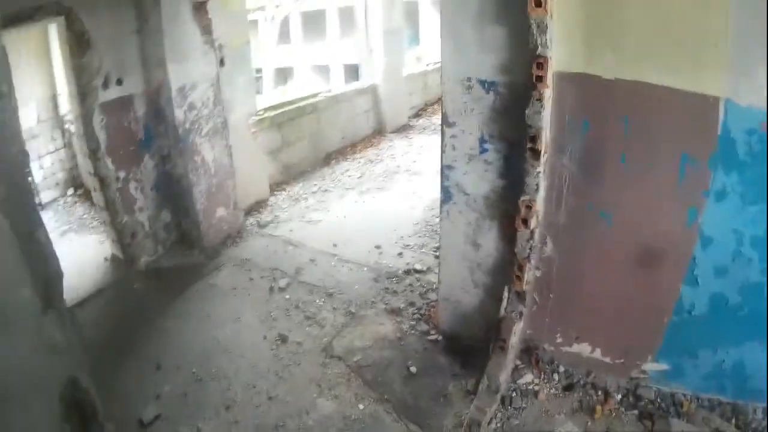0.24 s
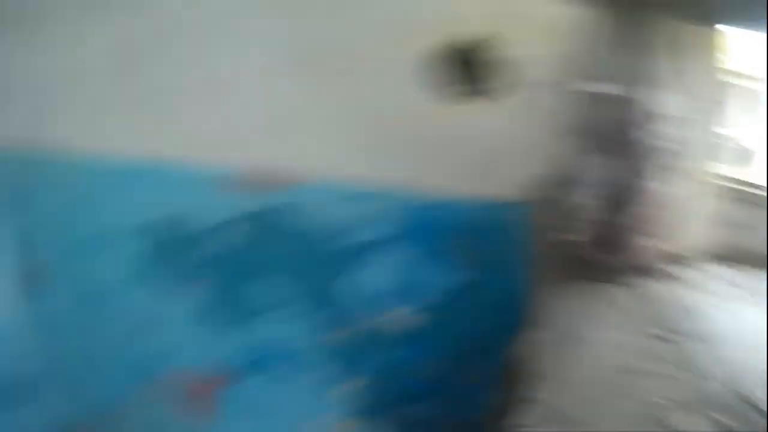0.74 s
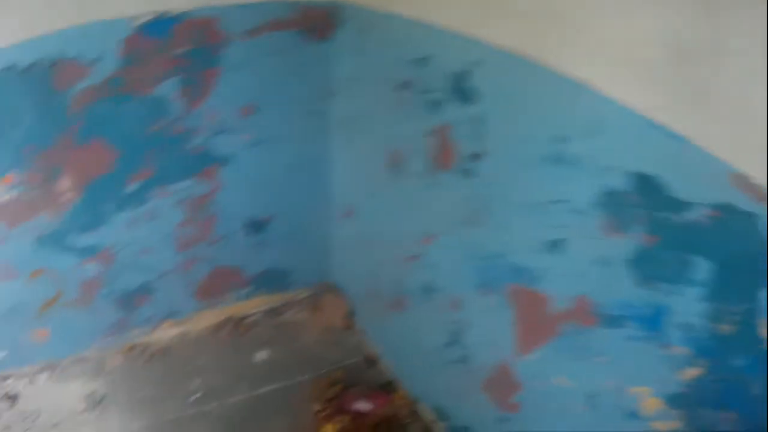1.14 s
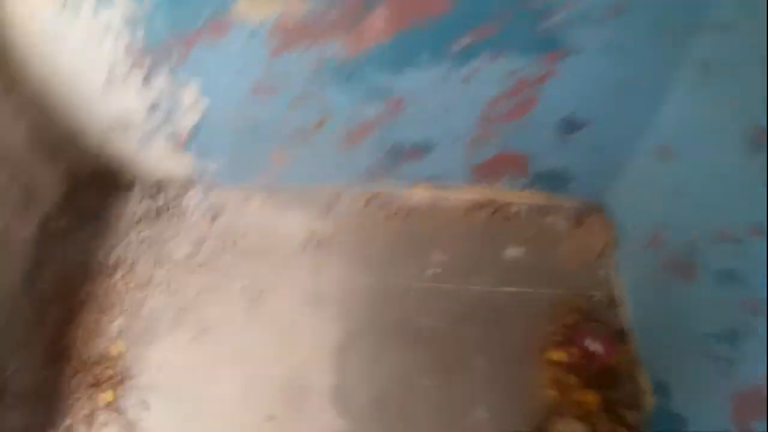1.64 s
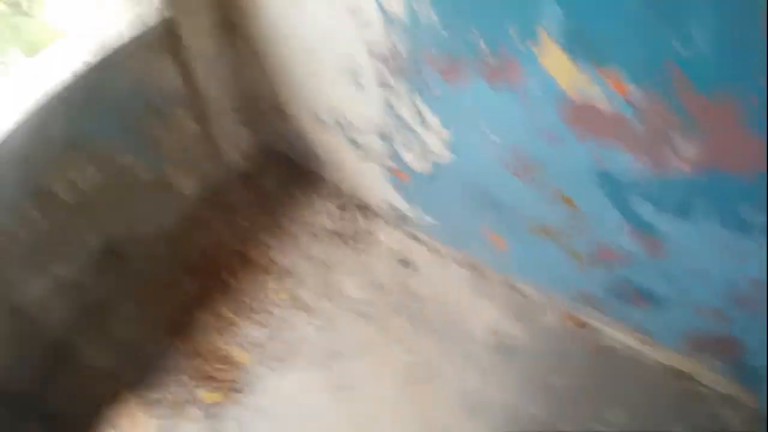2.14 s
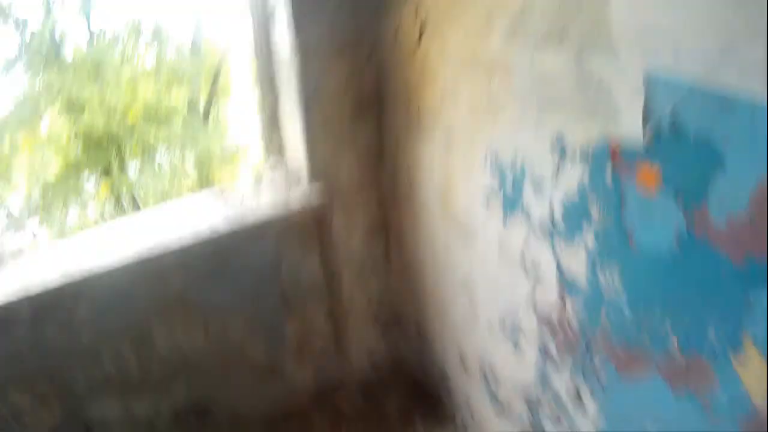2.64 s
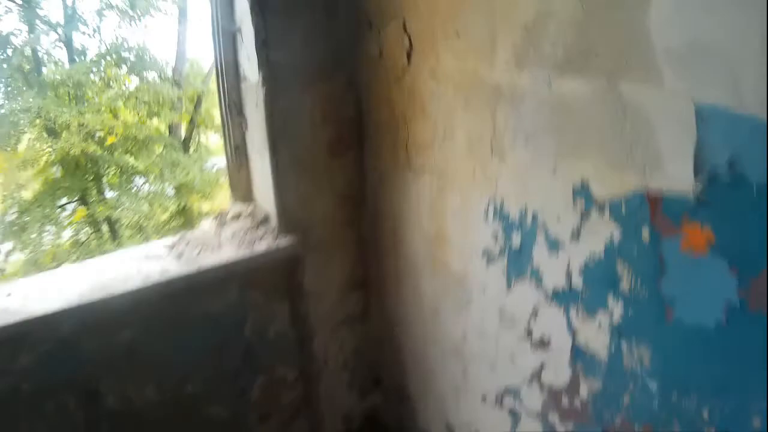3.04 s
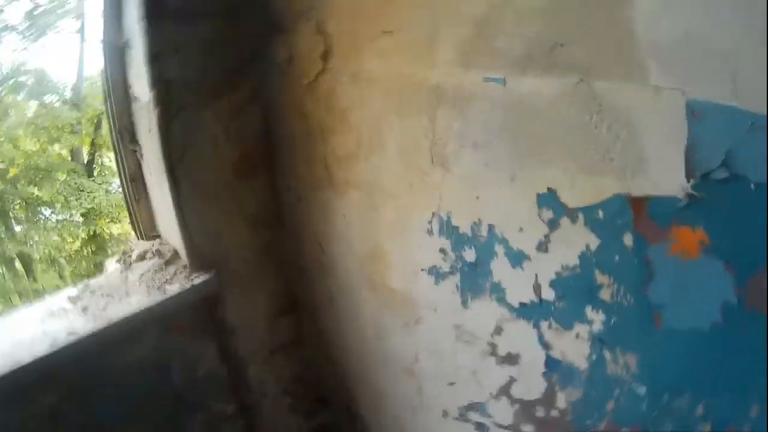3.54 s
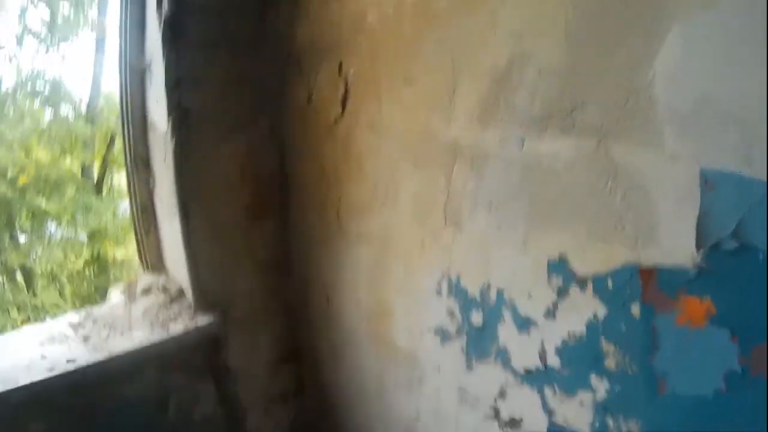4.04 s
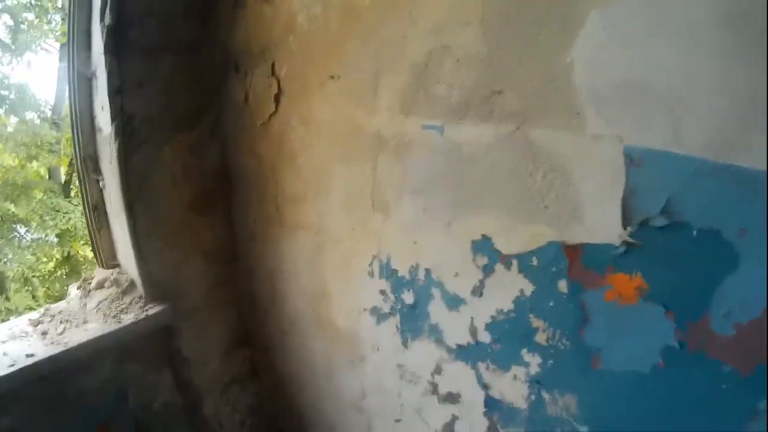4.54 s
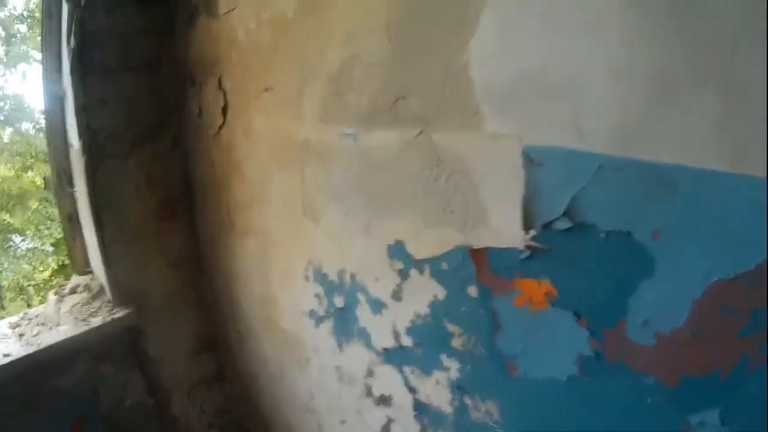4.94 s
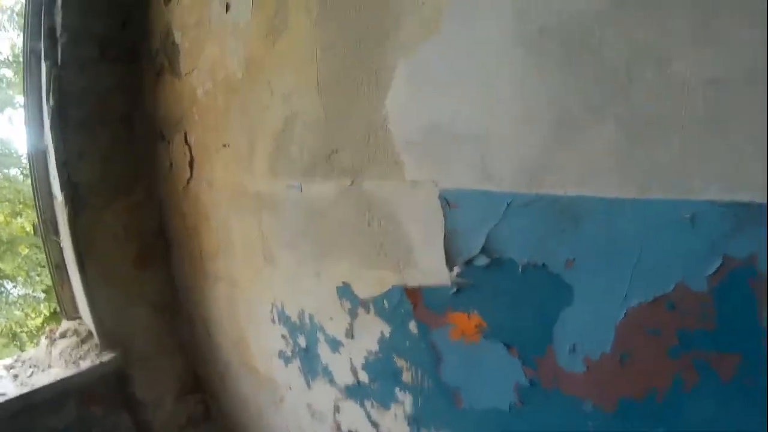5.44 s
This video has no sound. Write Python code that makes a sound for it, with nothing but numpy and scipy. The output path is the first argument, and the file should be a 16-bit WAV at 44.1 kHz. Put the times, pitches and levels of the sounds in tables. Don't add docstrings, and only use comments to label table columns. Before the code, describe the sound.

Close-up handling noise of a cased camera in a derelict room: muffled thumps, gritty scrapes, sharp knocks, faint hiss and thin whine.

```python
import sys
import numpy as np
from scipy import signal
from scipy.fft import rfft, irfft
from scipy.io import wavfile
from scipy.ndimage import uniform_filter1d

SR = 44100
rng = np.random.default_rng(int(sys.argv[2]) if len(sys.argv) > 2 else 0)


def transcribe(u):
    v = np.clip(np.atleast_2d(u).T, -1, 1)
    q = np.round(v * 32767).astype(np.int16)
    wavfile.write(sys.argv[1], SR, q)


def amplitude_ratio(level_db):
    exponent = np.asarray(level_db, float) / 20
    return 10 ** exponent


N = 251370
T = np.arange(N) / SR
CONTROL_STEP = 64
CONTROL_T = T[::CONTROL_STEP]
LIVE_S = 1.35

# hz, width_hz, level_db
CASE_LOW = [(130, 132, -11), (230, 97, -3), (398.7, 114, 6), (529, 252, -6), (819, 133, -0.5),
            (1110, 121, -0.5), (1315, 173, 1), (1530, 575, -16.5)]


def evened(x):
    return x / np.sqrt(np.mean(x ** 2) + 1e-20)


def shaped(x, spectrum):
    f, db = np.transpose(spectrum)
    hz = np.fft.rfftfreq(N, 1 / SR)
    gain_db = np.interp(np.log(hz + 1), np.log(f + 1), db, -80, -80)
    return evened(irfft(rfft(x) * amplitude_ratio(gain_db), N))


def add(mix, start_s, sound):
    part = mix[round(start_s * SR):][:len(sound)]
    part += sound[:len(part)]


def resonate(x, hz, width_hz):
    r = np.exp(-np.pi * width_hz / SR)
    pole = r * np.exp(2j * np.pi * hz / SR)
    return 2 * signal.lfilter([1 - r], [1, -pole], x).real


def modes(x, table):
    out = 0
    for k, (hz, width_hz, db) in enumerate(table):
        once = resonate(x, hz, 1.38 * width_hz)
        out = out + (-1) ** k * amplitude_ratio(db) * resonate(once, hz, 1.38 * width_hz)
    return out


def lumps(top_hz):
    lowpass = signal.butter(2, top_hz, fs=SR / CONTROL_STEP, output="sos")
    coarse = signal.sosfiltfilt(lowpass, rng.standard_normal(N // CONTROL_STEP + 2))
    coarse = np.clip(evened(coarse), -2.5, 2.5)
    return np.interp(np.arange(N) / CONTROL_STEP, np.arange(len(coarse)), coarse)


def circuit():
    # hz, level_db (per Hz)
    hiss_spectrum = [(12, -22), (20, -2.5), (33, -7), (65, -16.5), (81, -14), (158, -16), (422, -22),
                     (485, -24.5), (1530, -31), (1710, -31), (3070, -34), (9400, -36), (16000, -37.5)]
    live_spectrum = [(1470, -19), (2500, 7.5), (3440, 1.5), (8870, -7), (9730, -1), (10000, -11),
                     (14200, -9), (16000, -32)]
    # start_s, end_s, pitch_hz, level_db
    side_whines = [
        (1.51, 1.65, 8393, -82),
        (2.22, 2.38, 8393, -82),
        (3.35, 3.95, 8393, -86),
        (4.21, 4.46, 8393, -83),
        (5.35, 5.56, 8393, -86),
        (1.51, 1.65, 11186, -85),
        (2.22, 2.34, 11186, -85),
        (5.39, 5.52, 11186, -86),
        (1.9, 2.5, 7750, -91),
    ]
    whine_hz, throb_hz = 9525.3, 36.4
    live = T > LIVE_S

    hiss = amplitude_ratio(-65.5) * shaped(rng.standard_normal(N), hiss_spectrum)
    hiss = hiss + amplitude_ratio(-76.5) * shaped(rng.standard_normal(N), live_spectrum) * live
    throb_phase = 2 * np.pi * throb_hz * T
    throb = 1.05 + 2.1 * np.cos(throb_phase) - 0.25 * np.cos(3 * throb_phase)
    whine_db = np.where(live, -78.5, -86) + 2.3 * lumps(12)
    whine = amplitude_ratio(whine_db) * np.sin(2 * np.pi * whine_hz * T) * throb
    for start_s, end_s, hz, db in side_whines:
        fade = np.clip(np.minimum(T - start_s, end_s - T) / 0.023, 0, 1)
        whine = whine + amplitude_ratio(db) * (1 + 0.5 * throb) * np.sin(2 * np.pi * hz * T) * fade
    return hiss + whine


def strokes(table):
    span_db = 20
    peak_s, db, rise_s, fall_s, trait = np.transpose(table)[:, :, None]
    away = np.maximum((peak_s - CONTROL_T) / np.abs(rise_s), (CONTROL_T - peak_s) / np.abs(fall_s))
    return db - span_db * away, trait


def effort():
    # peak_s, peak_db, rise_s, fall_s, rumble_db (over the scrape)
    jolts = [(1.377, -48.5, 0.027, 0.083, 9.5), (1.548, -40, 0.052, 0.028, 9), (1.632, -50, .04, 0.06, 5),
             (1.69, -50, .07, .1, 5), (1.81, -50, .14, 0.27, -4), (2.128, -39, 0.021, 0.067, 2),
             (2.62, -41, 0.064, 0.082, 4), (2.56, -61, 0.071, 0.086, -5), (3.22, -39.5, .08, 0.064, 2.5),
             (3.495, -33, 0.039, 0.094, 5), (3.851, -34.5, 0.048, 0.12, 2.5),
             (4.18, -45.5, 0.18, 0.11, -1.5), (4.365, -35, 0.025, 0.069, 5.5),
             (4.48, -74, 0.049, 0.036, 13), (5.345, -66, .06, .06, 12), (1.99, -56.5, 0.16, .2, 9),
             (3.0, -59.5, 0.2, 0.18, 7), (1.59, -53.5, 0.11, 0.069, 8.5), (4.635, -40, 0.086, .04, -0.5),
             (4.916, -50, .045, 0.14, 0), (5.038, -37.5, 0.12, 0.051, -2), (5.57, -59.5, 0.015, 0.14, 12)]
    # peak_s, peak_db, rise_s, fall_s, bright_db (upper modes)
    drags = [(1.95, -52, 0.083, 0.57, -9), (2.09, -52.5, 0.24, 0.15, -6), (2.326, -47.5, .06, 0.18, -22),
             (2.76, -58, 0.13, 0.13, -3), (2.84, -42, 0.054, 0.1, -7.5), (2.93, -51, 0.11, .1, -26),
             (5.295, -61.5, 0.077, 0.035, -9), (2.986, -45, .13, 0.26, -15), (3.07, -43, 0.16, 0.048, -4.5),
             (3.455, -52, 0.24, 0.055, -13), (3.735, -40, 0.11, 0.033, -14), (4.062, -55, 0.21, 0.16, -12),
             (4.424, -41, 0.15, 0.013, -14), (4.305, -51, 0.042, 0.075, -10),
             (5.145, -45.5, .04, 0.086, -17), (5.1, -51, .1, .1, -9), (5.39, -44.5, 0.051, .2, -14),
             (3.96, -62, .05, 0.16, 2), (4.56, -51.5, 0.054, .2, -19), (4.75, -54.5, 0.039, 0.16, -7),
             (5.44, -37, 0.057, 0.083, -16), (5.55, -46, 0.16, 0.0098, -14), (5.684, -42, 0.02, 0.018, -15)]
    # peak_s, peak_db, rise_s, fall_s, bright_db (upper modes)
    scrapes = [(.704, -68.5, .025, .12, 1), (1.47, -58.5, 0.05, 0.19, -1), (2.195, -37, 0.07, 0.11, -7.5),
               (2.475, -36.5, .095, 0.1, -6.5), (3.154, -35.5, 0.019, 0.067, 1.5),
               (3.587, -37.5, 0.029, 0.058, 2), (3.915, -37, 0.071, 0.071, -3.5),
               (4.659, -24, 0.0136, 0.042, 5), (4.678, -27, 0.022, 0.01, 4), (4.697, -29.5, 0.03, 0.04, -7),
               (5.192, -45.5, 0.12, 0.017, -6.5)]
    jolt, weight = strokes(jolts)
    drag, dull = strokes(drags)
    scrape, sharp = strokes(scrapes)
    rest = np.where(CONTROL_T[None] > LIVE_S, 0., -60.)
    low = (jolt, drag, scrape, rest - 95)
    upper = (jolt - 10.5, drag + dull, scrape + sharp, rest - 91.5)
    rumble = (jolt + weight, drag - 4, scrape - 11 - 0.6 * sharp, rest - 58.5)
    spray = (jolt - 25.5, drag - 30, scrape - 13.5 + 0.48 * sharp, rest - 79)
    curves = []
    for parts in (low, upper, rumble, spray):
        power = (amplitude_ratio(np.concatenate(parts)) ** 2).sum(0)
        curves.append(np.interp(T, CONTROL_T, 10 * np.log10(power + 1e-20)))
    return curves


def rub():
    # hz, width_hz, level_db
    case_high = [(1887, 383, 19.5), (2300, 53, -3.5), (2360, 540, -6.5), (2710, 170, 5.5), (3103, 110, 3),
                 (3830, 170, 3), (4720, 420, -9)]
    # hz, level_db (per Hz)
    sway_spectrum = [(10, -27), (18, -9.5), (32, -6), (60, -15), (100, -14), (170, -12.5), (300, -31)]
    spray_spectrum = [(2200, -29), (2750, 5), (3620, -3.5), (3830, 10.5), (4050, -5.5), (4700, -2.5),
                      (5600, -10.5), (8500, -30), (16000, -32.5)]
    air_spectrum = [(1900, -19), (2600, 2), (3800, 0.5), (5200, -3), (7500, 3), (12000, 1), (16000, 0.5)]
    grit_per_s, grit_db, smooth = 900, 3.6, 0.55
    lumpy_db, patchy_db, rumble_lumpy_db = 2.5, 2.5, 2.5

    clicks = (rng.random(N) < grit_per_s / SR) * rng.choice([-1., 1.], N)
    clicks = clicks * amplitude_ratio(grit_db * np.minimum(rng.exponential(1, N), 2.8))
    lumpy = lumps(30.4)
    drive = (evened(clicks) + smooth * 2 * rng.standard_normal(N)) * amplitude_ratio(lumpy_db * lumpy)

    def wandering(table):
        total = 0
        for k, mode in enumerate(table):
            total = total + (-1) ** k * modes(drive * amplitude_ratio(patchy_db * lumps(28.7)), [mode])
        return evened(total)

    sway_db = rumble_lumpy_db * (lumps(12) + 1.5 * lumpy)
    sway = shaped(rng.standard_normal(N) * amplitude_ratio(sway_db), sway_spectrum)
    scrape_db, upper_db, rumble_db, spray_db = effort()
    out = amplitude_ratio(scrape_db + 3) * wandering(CASE_LOW) + amplitude_ratio(upper_db) * wandering(case_high)
    out = out + amplitude_ratio(rumble_db - 2) * sway + amplitude_ratio(spray_db) * shaped(drive, spray_spectrum)
    air_db = -70.5 + 0.47 * np.minimum(uniform_filter1d(scrape_db, 2000) + 35.5, 0)
    return out + amplitude_ratio(air_db) * shaped(rng.standard_normal(N), air_spectrum)


def snaps():
    # start_s, peak_db, pitch_hz, length_s
    grit = [(1.512, -35, 1190, 0.0043), (1.546, -29, 830, 0.0057), (1.808, -36.5, 804, 0.012),
            (2.13, -26, 1080, 0.0064), (2.185, -34, 1200, 0.0018), (2.611, -30.5, 1190, .0044),
            (2.684, -42, 1290, 0.0031), (2.704, -36, 1750, 0.0023), (2.734, -31.5, 1470, 0.0023),
            (2.824, -28, 1320, 0.0022), (2.833, -32, 1090, 0.002), (3.132, -38, 1130, .0035),
            (3.274, -39, 1180, 0.0026), (3.4995, -22, 1290, .004), (3.4875, -21, 1140, 0.004),
            (3.582, -25, 1180, 0.0054), (3.71, -43, 1290, 0.0063), (3.819, -35, 1100, 0.005),
            (3.864, -30, 1380, .012), (3.901, -24, 1387, 0.007), (2.534, -40, 1690, 0.0023),
            (4.302, -38, 1230, 0.0024), (4.364, -44, 1270, 0.0023), (4.641, -27, 1260, 0.0067),
            (5.192, -40.5, 1205, 0.0092), (5.396, -35, 1070, 0.0088), (5.429, -32, 1080, 0.006),
            (5.514, -39, 1190, 0.0072), (5.547, -36.5, 1280, 0.0064), (5.686, -39, 1236, 0.0026),
            (3.478, -28, 830, .004), (3.576, -30, 1600, .004), (3.589, -28, 1500, .005),
             (3.596, -30, 1500, .003), (3.601, -30, 1250, .003), (3.164, -27, 2680, .006),
             (3.164, -30, 3620, .006), (3.165, -17, 1820, .006), (4.653, -32, 3800, .009),
             (4.665, -25, 2650, .008), (4.656, -20, 1190, .005), (4.672, -18, 1290, .006),
             (4.696, -28, 1200, .005), (4.716, -29, 1500, .004), (3.853, -29, 1290, .006),
             (3.909, -27, 1350, .007), (3.922, -31, 1400, .005), (3.933, -36, 2000, .005),
             (3.956, -54, 3820, .01), (5.359, -43, 1300, .005), (5.443, -32, 1120, .008),
             (5.464, -36, 1350, .012), (3.703, -40, 1250, .004), (2.599, -35, 1200, .005),
             (2.183, -46, 2680, .006), (2.462, -46, 2720, .006), (2.372, -46, 1700, .004),
             (2.325, -44, 1150, .008), (1.6, -48, 1200, .008), (1.535, -60, 3820, .008),
             (4.355, -32, 800, .006), (4.17, -40, 1280, .008), (4.987, -36, 1300, .006),
             (5.138, -40, 1100, .005), (5.163, -40, 1350, .006), (5.08, -43, 1300, .006),
             (2.978, -42, 1800, .004), (3.73, -36, 1300, .007), (1.69, -44, 1200, .01),
             (2.65, -40, 1250, .006), (4.905, -44, 1400, .006), (5.03, -36, 1300, .008),
             (3.894, -31, 1200, .005), (4.678, -25, 1950, .006), (4.654, -44, 5800, .006),
             (4.668, -42, 5500, .01), (4.669, -19, 1050, .005), (5.394, -36, 1150, .003),
             (5.548, -35, 1280, .003), (2.21, -58, 5400, .02)]
    # start_s, peak_db, pitch_hz, length_s, bright_db
    knocks = [(0.698, -68.5, 2390, 0.0089, 10), (.705, -67, 5600, .01, -9), (1.637, -48, 2020, 0.0037, -2),
              (2.024, -49, 1720, 0.0041, -6), (3.078, -36, 1900, 0.0027, -5), (3.145, -43, 1970, .008, -22),
              (3.165, -13, 2130, 0.0053, -22.5), (3.162, -20, 3820, 0.0063, -3),
              (3.166, -13, 590, 0.0038, -22), (3.1628, -10, 1110, 0.0036, -35.5),
              (3.39, -48, 1800, 0.0046, -8), (3.5335, -24, 1940, 0.005, -30),
              (3.5314, -25, 4300, .0016, -20), (3.534, -44, 4700, .0035, -20),
              (3.532, -36, 9860, .0008, -20), (3.532, -45, 14900, .0006, -20),
              (3.5345, -19.5, 1090, 0.0039, -35), (3.147, -25, 950, .0042, -8),
              (3.165, -12, 833, 0.0047, -12), (3.542, -32, 1200, 0.004, -18.5),
              (4.663, -18, 1120, 0.0045, -9.5), (4.6675, -11.5, 2046, 0.0058, -10),
              (4.664, -24.5, 3830, 0.013, -20), (4.755, -38, 1100, 0.0015, -30)]
    # hz, width_hz, level_db
    edge_modes = [(3130, 420, 7), (3830, 320, 12.5), (4670, 2100, -5.5), (9950, 10000, -30.5)]
    grit_bright_db = -44
    rows = [(*row, grit_bright_db) for row in grit] + [*knocks]
    out, t = np.zeros(N), np.arange(round(0.042 * SR)) / SR
    for start_s, db, hz, length_s, bright_db in rows:
        length_s = max(length_s, 0.0005)
        u = t / length_s
        crack = rng.standard_normal(len(t)) * u * np.exp(-3 * u)
        width_hz = 150 + 1.34 / length_s
        body = modes(resonate(crack, hz, 2 * width_hz), [(hz, width_hz, 0)])
        patch = np.sin(2 * np.pi * hz * t) * 3 * u * np.exp(1 - 3 * u)
        body = body / np.abs(body).max() * 0.72 + patch
        case = resonate(modes(crack, CASE_LOW[2:]), 900, 1600)
        edge = modes(crack, edge_modes)
        body, case, edge = (p / np.abs(p).max() for p in (body, case, edge))
        add(out, start_s - 0.0006, amplitude_ratio(db) * (body + 0.13 * case + amplitude_ratio(bright_db - 4) * edge))
    return out


def clack():
    # start_s, peak_db, start_hz, sag_hz_per_ms, length_s
    pushes = [(3.5302, -3.2, 1730, 250, .0034), (3.53148, -13, 1450, 50, .0008), (.71, -62, 75, .1, .06),
              (2.61, -24, 260, 5, .007), (2.66, -40, 25, .05, .05), (2.73, -41, 20, .05, .06),
              (2.831, -29, 420, 20, .007), (2.977, -27, 480, 10, .007), (2.99, -42, 25, .05, .06),
              (4.45, -42, 14, .02, .07), (5.56, -40, 22, .05, .045), (1.384, -34, 340, 10, .012),
              (3.33, -46, 30, .05, .06), (5.14, -48, 70, .1, .04)]
    out = np.zeros(N)
    for start_s, db, hz, sag, length_s in pushes:
        t = np.arange(round(length_s * SR)) / SR
        cycles = hz * t - 500 * sag * t ** 2
        add(out, start_s, amplitude_ratio(db) * np.sin(np.pi * t / length_s) * np.sin(2 * np.pi * cycles))
    return out


def thumps():
    # start_s, peak_db, pitch_hz
    blows = [(1.361, -24, 130), (1.379, -22.5, 104), (1.386, -36, 213), (1.511, -24, 193),
             (1.536, -22.5, 314), (1.555, -29, 60), (1.625, -36, 109), (1.674, -30, 73), (1.68, -31, 230),
             (1.799, -38, 76), (1.799, -18.5, 212), (1.801, -26.5, 130), (1.92, -33, 72.7),
             (2.113, -12, 230), (2.302, -31.5, 203), (2.603, -23, 109.4), (2.607, -27, 252),
             (2.643, -29.5, 230), (2.825, -28, 284), (3.064, -39, 281), (5.558, -46, 50), (3.159, -19, 288),
             (3.4845, -16, 110), (3.4912, -6, 310), (3.494, -13, 190), (4.169, -35, 154),
             (5.514, -30.5, 250), (3.853, -17, 330), (4.355, -38, 226), (5.682, -33, 140)]
    # start_s, peak_db, pitch_hz
    dull_thumps = [(1.508, -18.5, 405), (1.677, -27.5, 420), (1.839, -27, 402), (2.414, -28, 439),
                   (2.86, -36, 440), (2.971, -28, 458), (3.158, -20, 542), (3.707, -28.5, 361),
                   (3.838, -26, 450), (3.902, -14, 510), (4.349, -23, 486), (3.215, -35, 441),
                   (2.165, -25, 414), (4.385, -26, 443), (4.581, -37, 446), (4.69, -37, 464),
                   (4.922, -37.5, 433), (5.013, -30, 496), (5.134, -34, 470), (5.386, -31, 434),
                   (5.418, -31, 380)]
    late_s, rise_s, rough = 0.005, 0.002, 0.25
    rows = [(s, db, hz, 0.0048 - 0.0021 * db) for s, db, hz in dull_thumps]
    rows += [(s, db, hz, 0.0056 - 0.00082 * db + 1.9 / hz) for s, db, hz in blows]
    out, t = np.zeros(N), np.arange(round(0.2 * SR)) / SR
    for start_s, db, hz, t60_s in rows:
        wobble = resonate(resonate(rng.standard_normal(len(t)), hz, 410), hz, 410)
        ring = np.sin(2 * np.pi * hz * t) + rough * evened(wobble)
        decay = amplitude_ratio(db - 60 * t / max(t60_s, 0.01))
        add(out, start_s + late_s, decay * ring * (1 - np.exp(-t / rise_s)))
    return out


def buckle():
    # start_s, pitch_hz, level_db, t60_s
    rings = [
        (3.173, 1873, -30, .13),
        (3.173, 4231, -46, .13),
        (3.168, 3780, -52, .2),
        (3.168, 2191, -54, .5),
        (4.715, 2191, -53, .6),
        (4.715, 1357, -52, .55),
        (3.96, 3810, -64, .15),
    ]
    out, t = np.zeros(N), np.arange(round(0.4 * SR)) / SR
    for start_s, hz, db, t60_s in rings:
        onset = np.minimum(t / 0.003, 1)
        add(out, start_s, amplitude_ratio(db - 60 * t / t60_s) * np.sin(2 * np.pi * hz * t) * onset)
    return out


def scene():
    return (circuit() + rub() + snaps() + clack() + thumps() + buckle())[None]


def low_pass(x):
    return signal.sosfilt(signal.butter(12, 16710, fs=SR, output="sos"), x)


def record(dry):
    clip_level, edge_hz = 0.69, 15750
    clipped = np.clip(dry, -clip_level, clip_level)
    mix = signal.oaconvolve(clipped, signal.firwin(511, edge_hz, fs=SR)[None], "same")
    return low_pass(mix)


dry = scene()
out = record(dry)
transcribe(out)
```